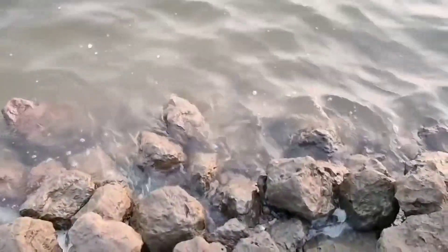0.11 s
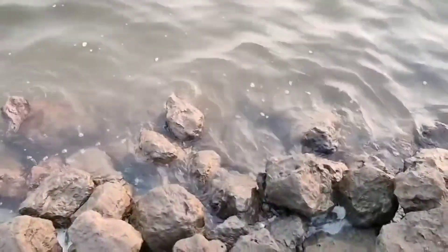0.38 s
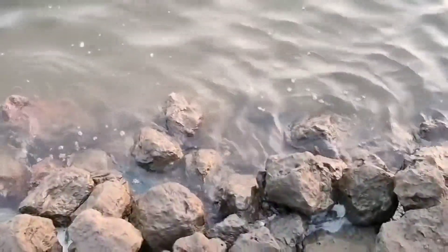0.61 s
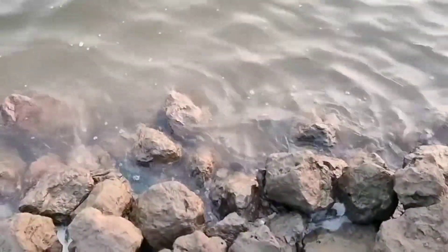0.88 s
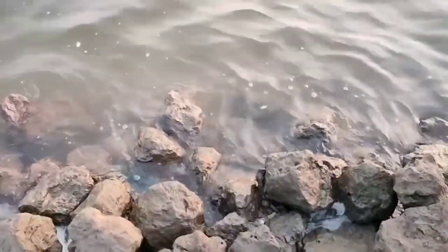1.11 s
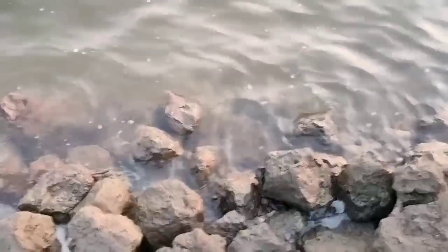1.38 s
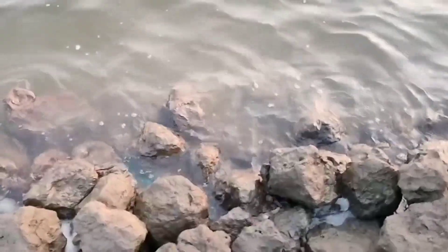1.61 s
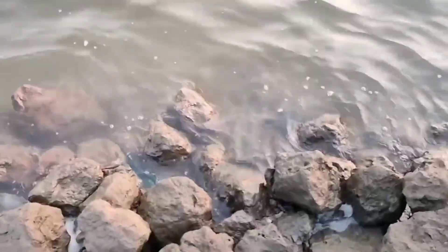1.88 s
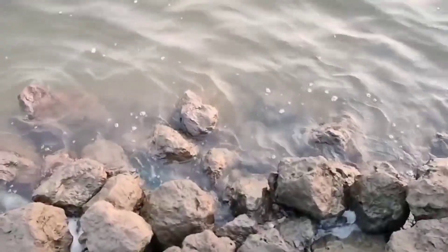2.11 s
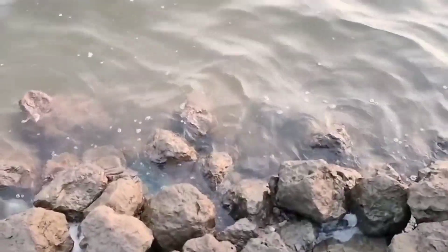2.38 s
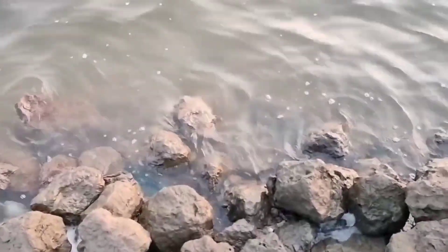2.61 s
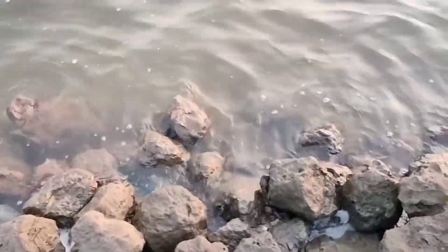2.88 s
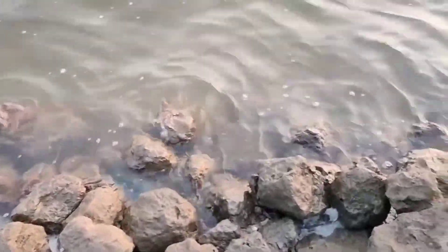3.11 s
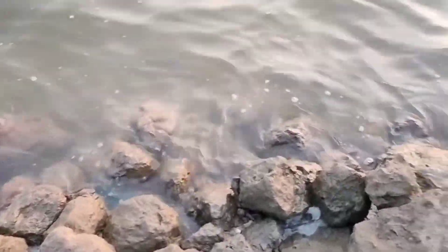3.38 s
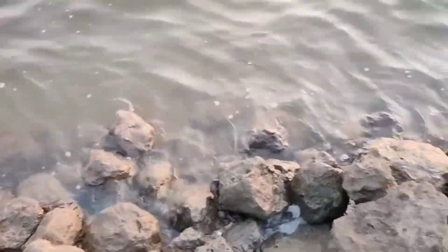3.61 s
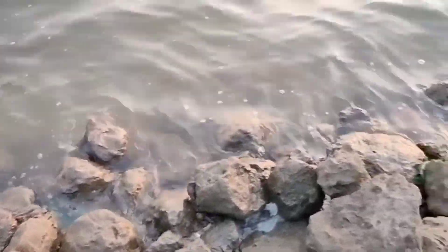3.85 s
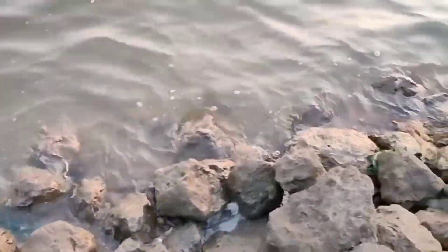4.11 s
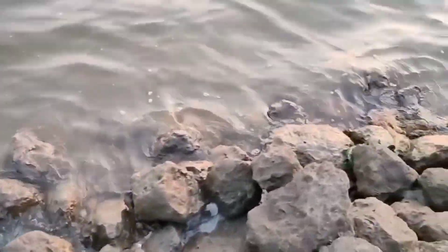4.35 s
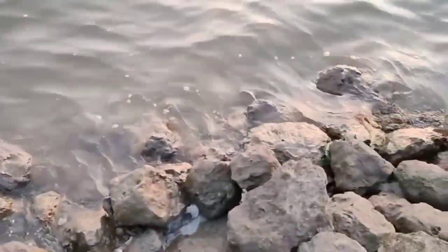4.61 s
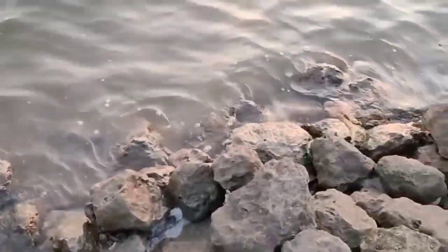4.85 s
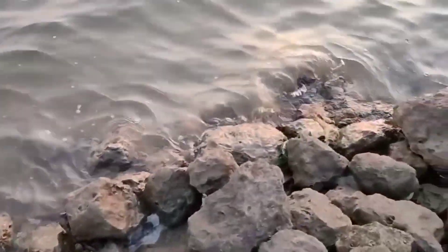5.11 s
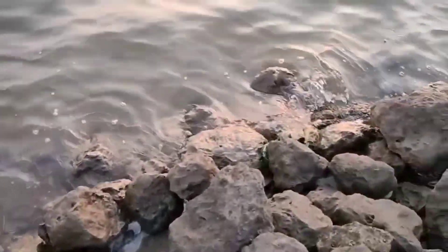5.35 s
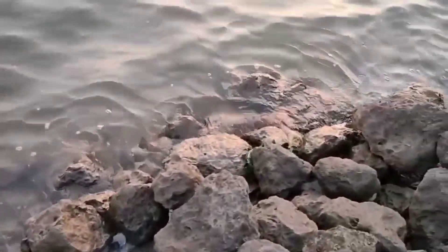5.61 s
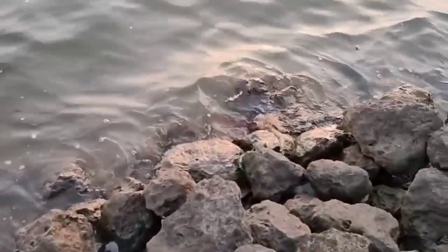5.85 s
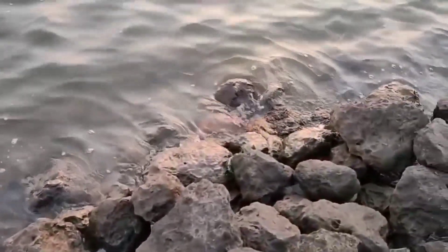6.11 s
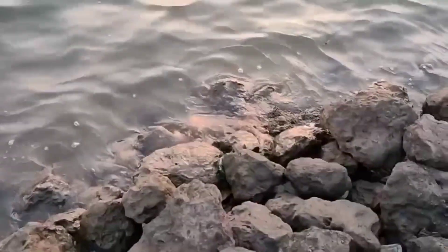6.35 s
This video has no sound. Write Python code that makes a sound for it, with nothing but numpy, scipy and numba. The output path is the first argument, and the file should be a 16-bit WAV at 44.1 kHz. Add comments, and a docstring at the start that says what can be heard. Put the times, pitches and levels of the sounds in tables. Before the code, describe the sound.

Close, irregular water lapping on rocks: hollow plops, wet smacks and fine bubbly hiss, under low wind rumble that grows late.

```python
"""River wavelets on a stone bank

Small waves lap at stones a metre or two below a hand-held phone. Trapped air rings as gliding
tones, smacks are clusters of short rings, foam and spray are swarms of tiny bubbles over a flickering
hiss. One far note falls; a breeze of low eddies and rumble buffets each of the two ports on its own."""
import sys
import numpy as np
from scipy import signal
from scipy.fft import rfft, irfft, next_fast_len
from scipy.io import wavfile
from scipy.ndimage import uniform_filter1d
from numba import njit

SR = 44100
rng = np.random.default_rng(int(sys.argv[2]) if len(sys.argv) > 2 else 0)


def pcm_store(signal):
    """Save signal as 16-bit PCM."""
    levels = np.round(np.clip(np.atleast_2d(signal), -1, 1) * 32767)
    wavfile.write(sys.argv[1], SR, levels.astype(np.int16).T)


def how_loud(loudness_db):
    """Turn decibels into a plain amplitude multiplier (0 dB gives 1, 20 dB gives 10)."""
    steps = np.asarray(loudness_db, float) / 20
    return 10 ** steps


N = 285768
TIME = np.arange(N) / SR

# breaking wavelets: (time [s], fizz level [dB], gurgle level [dB], hold [s]), before layer offsets
WAVELETS = [(0.0, -44.5, -41, 0.11), (0.195, -43.5, -33.5, 0.0094), (0.293, -49.5, -55, 0.11),
            (0.44, -55.5, -51, 0.31), (0.847, -50, -51.5, 0.0094), (0.975, -51.5, -48.5, 0.074),
            (1.12, -50.5, -44.5, 0.017), (1.2, -46.5, -63, 0.0059), (1.35, -46, -77, 0.0028),
            (1.616, -81, -62, .03), (1.874, -54.5, -50.5, 0.13), (2.099, -47.5, -50.5, 0.041),
            (2.249, -49, -50.5, 0.15), (2.438, -49, -43.5, 0.015), (2.573, -51.5, -52.5, 0.17),
            (2.838, -46, -41, 0.06), (2.942, -35, -40.5, 0.01), (3.013, -45.5, -46.5, 0.26),
            (3.409, -50, -41.5, 0.15), (3.574, -46.5, -79, 0.22), (3.79, -48.5, -41.5, 0.083),
            (4.059, -45, -43.5, 0.0035), (4.27, -56.5, -58, 0.16), (4.491, -49, -49, 0.12),
            (4.685, -44.5, -37.5, 0.14), (4.844, -50.5, -36.5, 0.14), (5.046, -51, -50.5, 0.083),
            (5.334, -42.5, -43, 0.11), (5.496, -45, -37, 0.15), (5.657, -53.5, -42, 0.13),
            (5.742, -48, -56, 0.15), (5.974, -52.5, -49.5, 0.13), (6.148, -44, -43.5, 0.14),
            (6.36, -39.5, -36.5, 0.038)]


def lag_at(hz, place):
    """Left-port lag [samples] for a place on the bank; long waves bend round the phone and lag less."""
    mean_samples, spread_samples = 15.52, 4.97  # before the pitch factor
    pitch_factor = 0.55 + 0.5 / (1 + (1600 / hz) ** 6)
    return (mean_samples + spread_samples * place) * pitch_factor


@njit
def ring(start, gain, hz0, hz1, swell, fade, phase, lag, shape):
    """Tones that swell, glide and fade (times in s); the left port is delayed by lag samples."""
    out = np.zeros((2, N))
    for g in range(len(start)):
        span = swell[g] + fade[g]
        for c in range(2):
            t0 = start[g] + (1 - c) * lag[g] / SR
            first = max(int(t0 * SR) + 1, 0)
            last = min(int((t0 + swell[g] + 5 * fade[g]) * SR) + 2, N)
            for i in range(first, last):
                t = i / SR - t0
                if t < swell[g]:
                    env = np.sin(np.pi / 2 * t / swell[g]) ** 2
                else:
                    env = np.exp(-((t - swell[g]) / fade[g]) ** shape)
                # the glide ends after span; turns is the integral of the pitch
                u = min(t, span)
                glide = t - u + (u * u / 2 + u ** 3 / (3 * span)) / (2 * span)
                turns = hz0[g] * t + (hz1[g] - hz0[g]) * glide
                out[c, i] += gain[g] * env * np.sin(2 * np.pi * turns + phase[g])
    return out


def colour(x, hz, db):
    """Shape a spectrum by straight lines in dB on a log-frequency axis."""
    size = next_fast_len(N + 4096)
    f = np.arange(size // 2 + 1) * SR / size + 1
    gain = how_loud(np.interp(np.log(f), np.log(hz), db))
    return irfft(rfft(x, size) * gain, size)[:N]


def walk(rate_hz):
    """Random levels held 1 / rate_hz s and slewed twice; spread 1."""
    k = int(SR / rate_hz)
    steps = np.repeat(rng.standard_normal(N // k + 1), k)
    steps = uniform_filter1d(uniform_filter1d(steps, k), k)[:N]
    return steps / steps.std()


def breeze(count=800):
    """Eddies passing a port suck at it for a cycle or two; weak ones come all the time over a low rumble."""
    # breeze at the ports, before layer offsets: (time [s], left level [dB], right level [dB])
    gusts = [(0.0, -47, -56.5), (0.6, -61, -66), (1.2, -61, -69.5), (1.44, -46.5, -62), (1.7, -54, -69),
             (2.3, -55, -61.5), (2.52, -47, -62), (2.75, -60.5, -68), (3.6, -53, -59.5), (4.0, -54.5, -63),
             (4.45, -53.5, -59), (4.68, -54, -53), (4.86, -43.5, -40.5), (5.04, -57, -73),
             (5.5, -52.5, -39), (5.76, -38, -40.5), (6.3, -47, -33.5), (6.48, -60, -41.5)]
    # strong eddies, left then right port, before sharpening: (time [s], peak [dB], pitch [Hz])
    strong_eddies = [
        [(0.056, -31.5, 167), (0.271, -34.5, 149), (0.808, -31, 173), (0.82, -26, 150), (0.831, -32, 153),
         (0.864, -33.5, 165), (1.051, -29, 147), (1.196, -28.5, 111), (1.304, -38.5, 104), (1.407, -29.5, 98),
         (1.468, -32.5, 120), (1.508, -37, 152), (1.549, -32.5, 92), (1.783, -31.5, 161), (1.797, -35.5, 153),
         (2.553, -37, 198), (2.568, -30.5, 209), (2.584, -26.5, 173), (2.602, -38, 170), (3.047, -34, 120),
         (3.84, -34, 135), (3.875, -31, 150), (3.985, -30.5, 124), (4.088, -35.5, 134), (4.272, -31.5, 146),
         (4.463, -29, 129), (4.512, -32.5, 174), (4.579, -31, 128), (4.765, -29.5, 126), (4.848, -30.5, 119),
         (4.875, -30, 106), (4.909, -32, 117), (5.14, -21, 119), (5.462, -26.5, 145), (5.69, -27.5, 150),
         (5.823, -22.5, 183), (5.942, -23, 142), (5.958, -22.5, 108), (6.004, -25, 121), (6.138, -21.5, 192)],
        [(4.681, -28, 224), (5.36, -33, 141), (5.636, -23.5, 230), (5.674, -19.5, 211), (5.72, -26, 181),
         (5.745, -25, 190), (5.834, -22, 149), (5.866, -21.5, 190), (5.884, -24.5, 230), (5.912, -20.5, 205),
         (5.979, -23.5, 138), (5.989, -19.5, 224), (6.0, -45, 160), (6.03, -21.5, 247), (6.05, -19.5, 220),
         (6.118, -21, 167), (6.135, -19, 190), (6.149, -21, 155), (6.187, -22, 180), (6.201, -23, 238),
         (6.215, -19.5, 211), (6.223, -19.5, 164), (6.23, -22, 149), (6.251, -17, 218), (6.258, -18.5, 180),
         (6.279, -21, 130), (6.285, -19.5, 210), (6.367, -21.5, 132), (6.383, -21.5, 192), (6.432, -19.5, 295)],
    ]
    # per port (left, right): swell at -30 dB, and its change per dB above that
    swell_cycles, swell_cycles_per_db = (0.95, 0.24), (-0.0549, 0.12)
    train_db, train_spread_s = -11.5, 0.014
    s, *level = np.transpose(gusts)
    out = []
    for port in range(2):
        level_db = np.interp(TIME, s, level[port])

        # three eddies, weaker on average, scatter before and after each strong one
        at, db, hz = np.array(strong_eddies[port], float).T
        n = rng.standard_normal((3, 3, len(at)))
        at = np.append(at, at + train_spread_s * n[0])
        db = np.append(db, db + train_db + 2.3 * n[1])
        hz = np.append(hz, hz * np.exp(0.41 * n[2]))
        cycles = swell_cycles[port] + swell_cycles_per_db[port] * (db + 30)
        swell = np.maximum(cycles, 0.2) / hz

        # weak eddies at random times; faster air sheds quicker ones
        u, size = rng.random((2, count)), rng.exponential(size=count)
        weak_s = u[0] * N / SR
        gust_db = np.interp(weak_s, TIME, level_db)
        weak_hz = 75 * 2.59 ** u[1] * how_loud(0.35 * (gust_db + 52.5))
        at = np.append(at, weak_s)
        db = np.append(db, gust_db - 0.7 + 4 * np.minimum(size, 2.5))
        hz = np.append(hz, weak_hz)
        swell = np.append(swell, 1 / weak_hz)

        # the deepest suction falls on the crest of the swell
        phase = -np.pi / 2 - 2 * np.pi * hz * swell
        fade = (1.05, 0.72)[port] * swell
        sucks = ring(at - swell, how_loud(db), hz, hz, swell, fade, phase, 0 * at, 2.0)[1]
        # suction is sharper than the push that follows
        sucks = sucks - 4 * (sucks ** 2 - uniform_filter1d(sucks ** 2, size=400))

        rumble = colour(rng.standard_normal(N), [20, 50, 120, 200, 350, 900], [-14, 12, 11, 4, -6.5, -81])
        rumble = how_loud(level_db + 4.5 + 8.2 * walk(11)) * rumble
        # strong gusts boil higher up
        boil = colour(rng.standard_normal(N), [120, 300, 900], [-10, 12, -30])
        boil = how_loud(1.5 * level_db - 32) * boil
        out.append(sucks + boil + rumble)
    return np.array(out)


def whistle():
    """One faint falling note, probably a distant bird: a tone that swells and fades."""
    # (start [s], peak [dB], first pitch [Hz], last pitch [Hz], swell plus fade time [ms])
    far_note = [(5.12, -52.5, 2040., 1720., 135.)]
    s, db, hz0, hz1, length_ms = np.transpose(far_note)
    half_s = length_ms / 2000
    return ring(s, how_loud(db), hz0, hz1, half_s, half_s, 0 * s, lag_at(hz0, 0), 2.1)


def wash(low_db, high_db):
    """Further wavelets along the bank blur into a hiss whose bands flicker."""
    out = 0
    for hz in 640 * 2 ** np.arange(0, 4.8, 0.52):
        near, far = rng.standard_normal(N), rng.standard_normal((2, N))
        shared = np.array([np.roll(near, int(lag_at(hz, 0))), near])
        sos = signal.butter(2, [hz / 1.19, hz * 1.19], "bandpass", fs=SR, output="sos")
        band = signal.sosfilt(sos, shared + 0.5 * far)
        level_db = low_db if hz < 1700 else high_db
        out = out + how_loud(level_db + 2 * walk(25)) * band
    return out


def swarm(level_db, lo_hz, hi_hz, cycles, glide, scatter_db, count):
    """Many small bubbles: random time, pitch and place, a few larger than the rest."""
    u, size = rng.random((4, count)), rng.exponential(size=count)
    s, hz = u[0] * N / SR, lo_hz * (hi_hz / lo_hz) ** u[1]
    last_hz = hz * (1 + glide * (2 * u[3] - 0.5))
    fade = cycles * (1.1 + 1.49 * u[2]) / hz
    swell = 0.17 * fade + 0.69 / hz
    gain = how_loud(np.interp(s, TIME, level_db) + scatter_db * np.minimum(size, 3.1))
    lag = lag_at(hz, rng.standard_normal(count))
    return ring(s, gain, hz, last_hz, swell, fade, 2 * np.pi * u[3], lag, 0.71)


def small_bubbles(gurgle_db):
    """Gurgle: small air pockets ring for several cycles with a slight glide."""
    level_db = gurgle_db + 1.7 * walk(18) - 9.5
    return swarm(level_db, 600, 1800, cycles=5.0, glide=0.16, scatter_db=3.3, count=2000)


def foam(patchy_db):
    """Fizz: tiny bubbles ring all over the treble in quick patches."""
    return swarm(patchy_db - 6.5, 1620, 15500, cycles=4.5, glide=0.08, scatter_db=4.0, count=11000)


def spray(patchy_db):
    """Fine drops: high rings damped within a few cycles, without glide."""
    return swarm(patchy_db + 2.5, 3500, 12500, cycles=1.1, glide=0, scatter_db=3.9, count=1800)


def smacks(count=28):
    """Water slaps stone: a tight cluster of short rings, strongest around its centre pitch."""
    # before layer offsets: (time [s], peak [dB], centre pitch [Hz])
    slaps = [(0.0484, -21, 5660), (0.197, -21, 3600), (0.3475, -23.5, 2760), (0.929, -28.5, 5780),
             (1.1089, -22, 1740), (1.1278, -26, 3280), (1.16, -28, 5640), (1.2112, -32.5, 2670),
             (1.35, -27.5, 3500), (1.5098, -31.5, 2980), (2.313, -29.5, 2200), (2.4408, -24.5, 5780),
             (2.495, -31.5, 2080), (2.6294, -19, 5640), (2.6278, -37.5, 2320), (2.6669, -32.5, 2700),
             (2.9084, -22.5, 2840), (2.927, -18.5, 2840), (2.936, -24, 3150), (2.991, -25, 3640),
             (3.0013, -21, 3650), (3.222, -27, 5860), (3.5048, -20.5, 5560), (3.8484, -21.5, 3340),
             (3.8748, -27, 3170), (4.477, -31, 2650), (4.547, -24.5, 3350), (4.7213, -24.5, 3470),
             (4.8495, -23.5, 2790), (4.8639, -23.5, 2820), (5.0724, -31, 2930), (5.084, -21, 3180),
             (5.1934, -28, 6080), (5.2076, -26.5, 5720), (5.241, -30.5, 4920), (5.345, -29, 2910),
             (5.384, -19, 2730), (5.478, -25, 3760), (5.5179, -26.5, 3380), (5.5475, -18.5, 3710),
             (5.6154, -22, 5920), (5.679, -30.5, 3660), (5.696, -22, 2780), (5.788, -29.5, 3280),
             (5.822, -20.5, 3250), (5.8516, -26.5, 4000), (5.893, -27, 3580), (5.9525, -31.5, 2710),
             (6.134, -28.5, 3520), (6.191, -24, 3400), (6.237, -21.5, 2640), (6.253, -27.5, 6030),
             (6.352, -26.5, 3140)]
    s, db, hz = np.repeat(np.array(slaps, float), count, axis=0).T
    u, n = rng.random((3, len(s))), rng.standard_normal(len(s))
    cluster_s = np.full(len(s), 0.001834)
    pitch = np.clip(hz * np.exp(0.433 * n * abs(n) / 1.32), 500, 15500)
    place = 0.5 * np.repeat(rng.standard_normal(len(slaps)), count)
    lag = lag_at(pitch, place)

    # the first contact is a snap far too short to have a pitch
    first = slice(None, None, count)
    snap_s = s[first] + 0.12 * cluster_s[first]
    bright = np.full(len(slaps), 9000.0)
    snap = ring(snap_s, how_loud(db[first] + 9), bright, bright, 0.068 / bright, 0.67 / bright,
                0 * bright, lag[first], 1.0)
    snap = snap - uniform_filter1d(snap, size=25)

    start = s + 1.6 * cluster_s * u[0] * u[2]
    gain = how_loud(db - 11 - 4.3 * n ** 2)
    cluster = ring(start, gain, pitch, pitch, 0.7 / pitch, 0.35 * cluster_s, 2 * np.pi * u[1], lag, 0.17)
    return snap + cluster


def bubbles():
    """Air pockets closing between the stones: a rounded swell, then the ring is choked off."""
    # (time in the swell [s], peak [dB], first pitch [Hz], last pitch [Hz], nominal length [ms])
    air_pockets = [(0.016, -37.5, 762, 800, 26.7), (0.048, -45.5, 493, 500, 18),
                   (0.196, -16, 790, 736, 4.3), (0.135, -48, 986, 1050, 32), (0.204, -36.5, 313, 592, 12.1),
                   (0.232, -41, 1070, 1180, 5.9), (0.258, -40.5, 704, 730, 11), (0.349, -49, 370, 304, 9.8),
                   (0.411, -50, 1420, 1480, 18), (0.525, -44, 680, 810, 11.3),
                   (0.746, -40.5, 1095, 1080, 4.2), (0.86, -51, 943, 975, 30), (0.707, -46.5, 550, 560, 27),
                   (1.034, -46.5, 830, 1350, 17), (1.109, -40, 670, 780, 13), (1.121, -41, 1350, 1410, 4.1),
                   (1.36, -39.5, 1020, 1060, 2.9), (1.402, -54, 253, 625, 23), (1.548, -48, 690, 690, 19),
                   (1.602, -49.5, 1027, 1040, 12), (1.722, -54, 670, 750, 9.9), (1.76, -59, 704, 1075, 25),
                   (1.862, -37.5, 1470, 1440, 2.9), (1.872, -43, 718, 1130, 20),
                   (1.889, -27.5, 742, 682, 8.9), (2.052, -45.5, 538, 618, 36),
                   (2.087, -35.5, 723, 750, 8.2), (2.137, -43, 880, 906, 6.1), (2.375, -51, 514, 528, 24),
                   (2.415, -34, 600, 625, 6.6), (2.443, -30.5, 700, 730, 5.4),
                   (2.446, -32, 1520, 1600, 1.7), (2.494, -35.5, 1030, 870, 9), (2.5, -42, 660, 710, 13.6),
                   (2.566, -39.5, 724, 710, 11.5), (2.632, -45, 1400, 1350, 8.8),
                   (2.645, -48, 623, 1305, 26), (2.685, -53, 590, 578, 24.6), (2.877, -35, 646, 530, 2.7),
                   (2.914, -29.5, 1030, 1070, 6.9), (2.947, -29.5, 900, 890, 4.1),
                   (2.98, -41, 1350, 1360, 8.4), (3.085, -49.5, 1280, 1320, 20), (3.005, -37, 803, 723, 14),
                   (3.403, -30, 864, 986, 5.2), (3.54, -51, 500, 660, 22), (3.77, -54.5, 514, 465, 35),
                   (3.477, -38, 707, 1080, 15.8), (3.704, -42, 1090, 1015, 11),
                   (3.725, -46, 1280, 1360, 6.9), (3.814, -31, 650, 663, 11.3),
                   (3.815, -44, 1320, 1480, 12), (3.834, -33, 680, 734, 9.4), (4.027, -43.5, 740, 974, 15),
                   (4.104, -40.5, 1200, 1200, 13), (4.4, -41, 1010, 1110, 9.4),
                   (4.511, -42.5, 570, 550, 14), (4.551, -33.5, 730, 750, 14.4),
                   (4.72, -30.5, 797, 810, 8.6), (4.756, -28.5, 1800, 1800, 5.3), (4.805, -28, 810, 790, 6),
                   (4.851, -38, 710, 704, 13.6), (4.875, -31, 1060, 1070, 9.4),
                   (4.928, -27.5, 846, 986, 6.5), (4.979, -32, 1770, 1840, 7),
                   (4.986, -30.5, 1040, 1070, 5.8), (5.048, -32.5, 706, 783, 17.7),
                   (5.248, -44, 1080, 1050, 10), (5.375, -41, 500, 594, 20), (5.32, -44, 680, 696, 18),
                   (5.405, -38, 980, 990, 7.7), (5.515, -32.5, 1060, 1190, 9.8),
                   (5.518, -22.5, 660, 640, 5.1), (5.553, -27, 720, 710, 5.7),
                   (5.595, -33.5, 1050, 1090, 9.6), (5.699, -37.5, 1305, 1066, 11.6),
                   (5.978, -42, 1110, 1230, 7.2), (5.875, -40.5, 550, 563, 13),
                   (6.087, -36, 960, 1010, 6.5), (6.229, -31, 1540, 1550, 3.9), (6.24, -41, 1246, 1440, 22),
                   (6.339, -40, 1040, 947, 16), (6.388, -25.5, 670, 600, 6.3),
                   (6.412, -26.5, 950, 1106, 6.9)]
    s, db, hz0, hz1, length_ms = np.array(air_pockets, float).T
    chance = rng.random((2, len(s)))
    length = np.maximum(length_ms, 2) / 1000
    lag = lag_at(hz0, 2 * chance[1] - 1)
    return ring(s - 0.1485 * length, how_loud(db), hz0, hz1, 0.48 * length, 0.84 * length,
                2 * np.pi * chance[0], lag, 1.08)


def stones(x, level_db=-7.5):
    """The rough stones scatter each sound into a short blur, different at each port."""
    t60_s = 0.02
    tail = rng.standard_normal((2, 1024)) * np.exp(-np.log(1000) * TIME[:1024] / t60_s)
    tail = tail / np.sqrt(np.sum(tail ** 2, axis=1, keepdims=True))
    return x + how_loud(level_db) * signal.fftconvolve(x, tail, axes=1)[:, :N]


def surge(peak_db, fall_db_per_s, calm_db):
    """Level [dB] of all wavelets: each breaks fast, holds, then drains slower to the calm between."""
    rise_db_per_s = 215
    t = TIME[::64]
    power = how_loud(calm_db) ** 2
    for (s, _, _, hold_s), db in zip(WAVELETS, peak_db):
        before_s, after_s = np.maximum(s - t, 0), np.maximum(t - s - hold_s, 0)
        below_db = rise_db_per_s * before_s + fall_db_per_s * after_s
        power = power + how_loud(db - below_db) ** 2
    return np.interp(TIME, t, 10 * np.log10(power))


def water():
    """The surges of the wavelets drive gurgle, fizz, spray and hiss; bubbles and smacks stand out."""
    _, fizz_peak_db, gurgle_peak_db, _ = np.transpose(WAVELETS)
    fizz_db = surge(fizz_peak_db, fall_db_per_s=170, calm_db=-59.5)
    gurgle_db = surge(gurgle_peak_db, fall_db_per_s=149, calm_db=-59.5)
    patchy_db = fizz_db + 2.4 * walk(80) + 2.1 * walk(30)
    hiss = wash(gurgle_db - 10.5, (fizz_db + patchy_db) / 2 - 2.5)
    swarms = small_bubbles(gurgle_db) + foam(patchy_db) + spray(patchy_db)
    return hiss + stones(swarms + smacks() + bubbles())


def scene():
    """Water and far note pass the narrow ports; the breeze acts on the ports directly."""
    # response of the ports: (frequency [Hz], left level [dB], right level [dB])
    port_response = [(347, 6, 8), (500, 5.5, 5.5), (740, -6, -9), (1126, 7, 3), (1200, 2, -3.5),
                     (1512, 2, 0), (2020, -3, -9.5), (2560, 2.5, -1.5), (4090, 1.5, -3.5),
                     (4670, -8.5, -3.5), (6190, -2.5, 2.5), (7420, -8, -10), (8700, -16.5, -58),
                     (9020, -34.5, -63), (12300, -28, -26), (15300, -46, -30)]
    hz, *response = np.transpose(port_response)
    heard = [colour(x, hz, db) for x, db in zip(whistle() + water(), response)]
    return breeze() + np.array(heard)


def low_pass(x):
    """Removes everything above the highest recorded frequency."""
    return signal.sosfilt(signal.butter(12, 15850, fs=SR, output="sos"), x)


def record(dry):
    """The phone cuts the deepest bass."""
    low_cut = signal.butter(2, 60, "highpass", fs=SR, output="sos")
    mix = signal.sosfilt(low_cut, dry)
    return low_pass(mix)


dry = scene()
out = record(dry)
pcm_store(out)
```